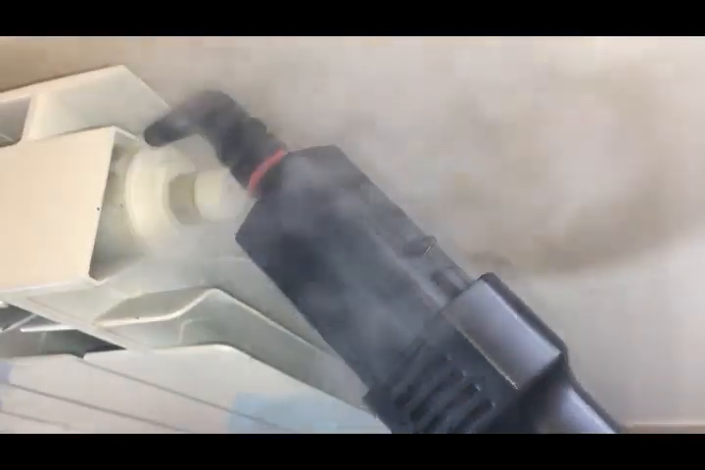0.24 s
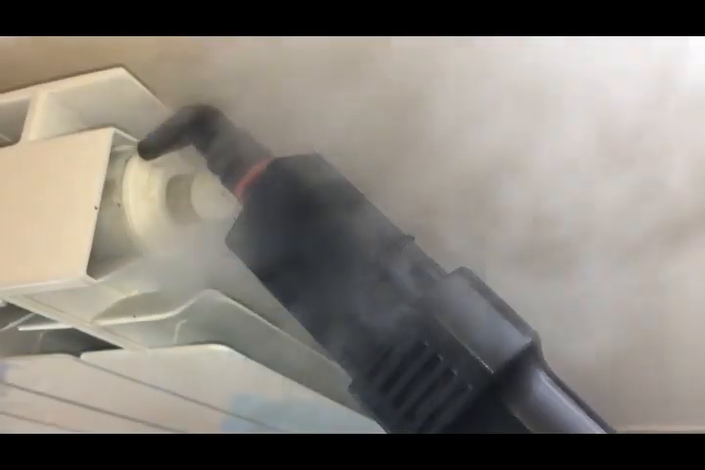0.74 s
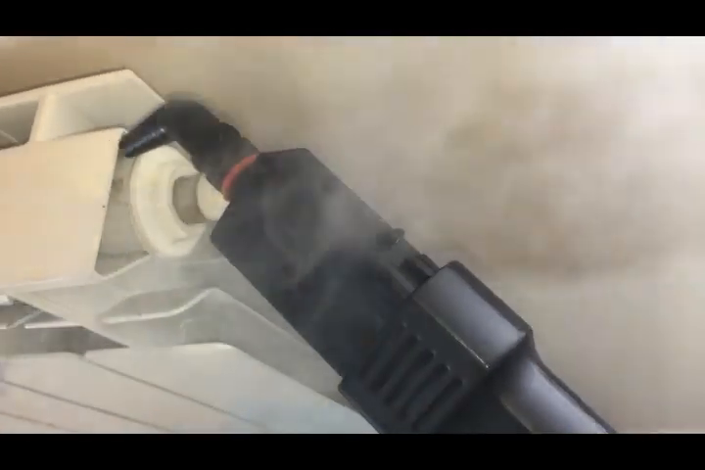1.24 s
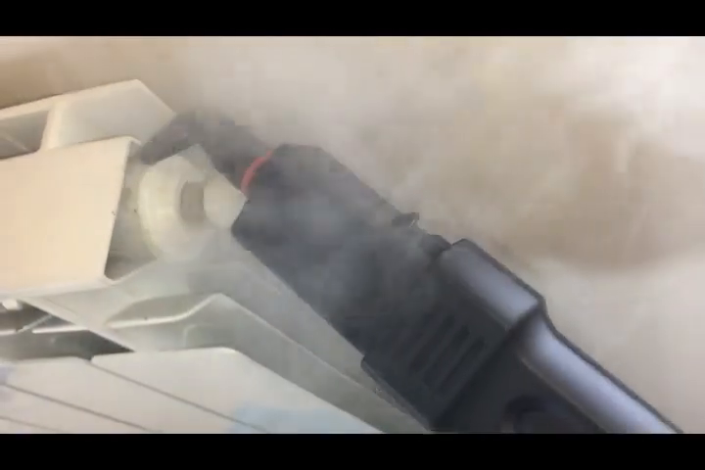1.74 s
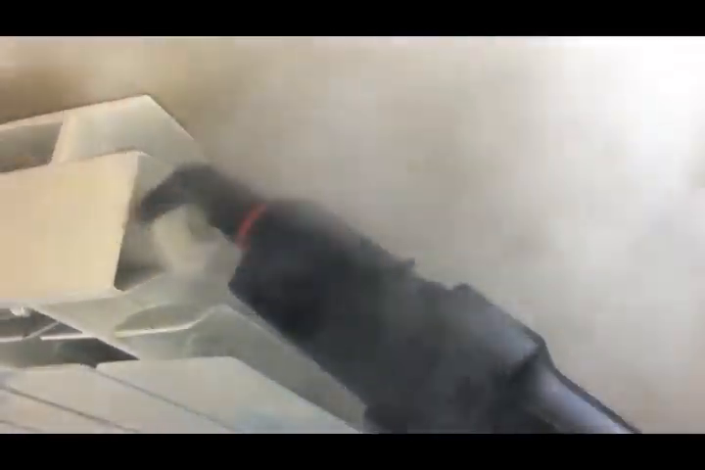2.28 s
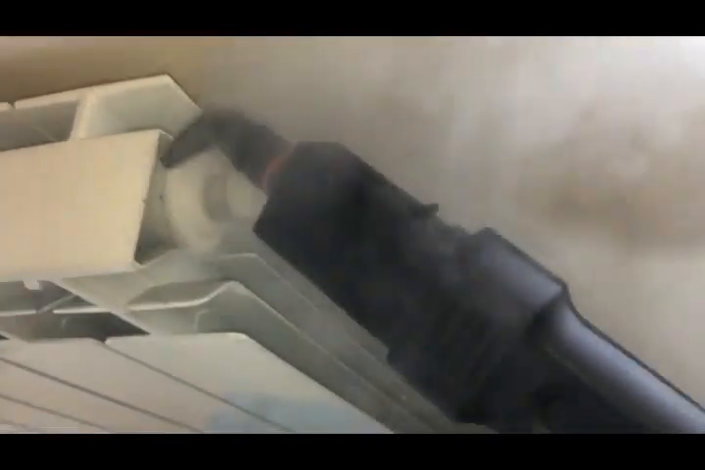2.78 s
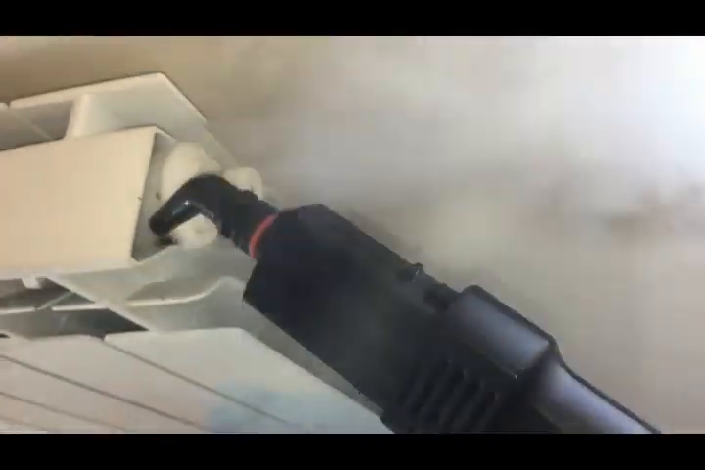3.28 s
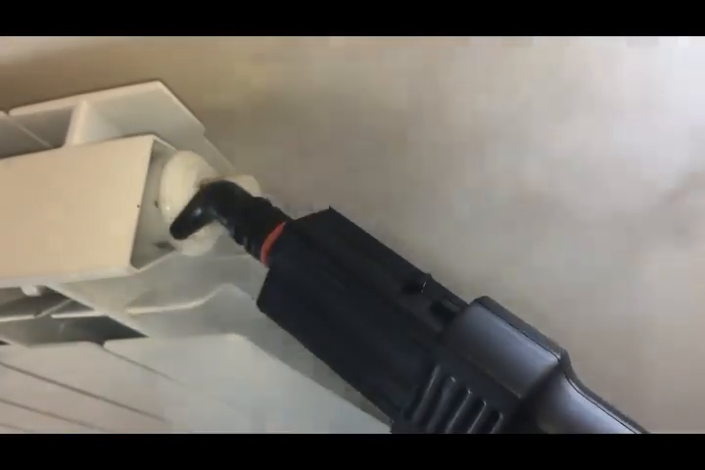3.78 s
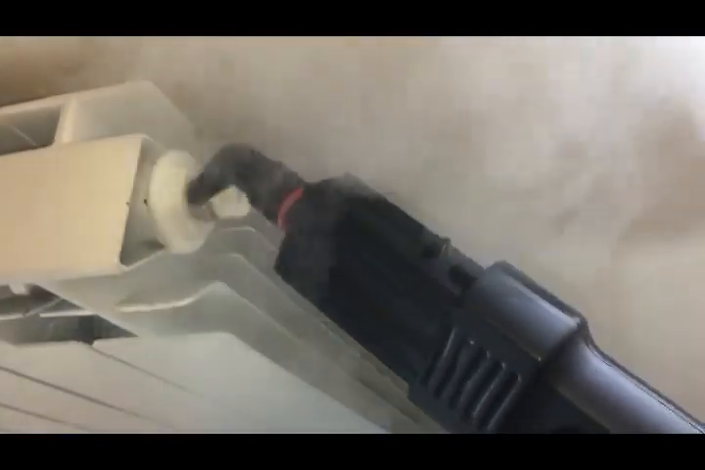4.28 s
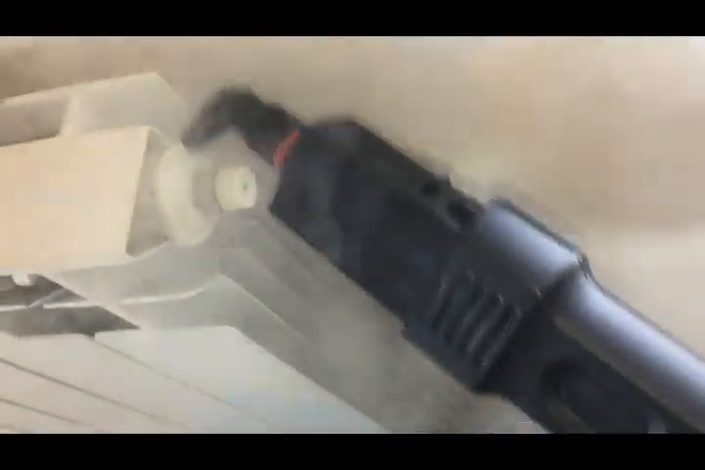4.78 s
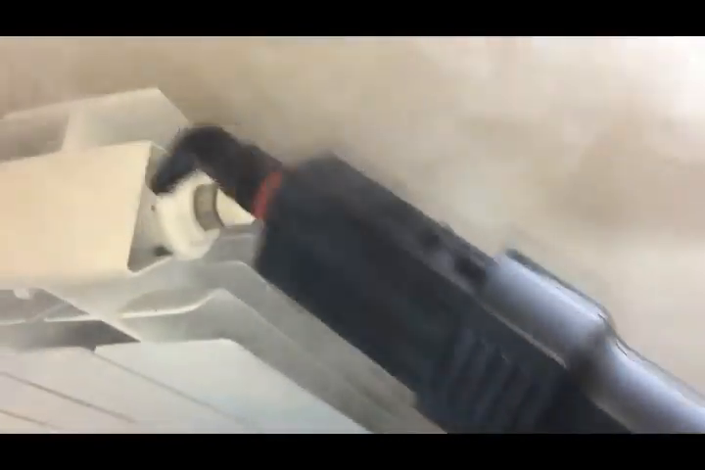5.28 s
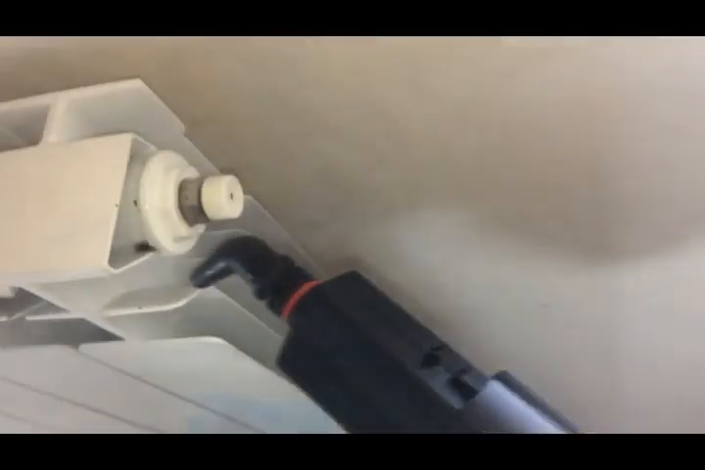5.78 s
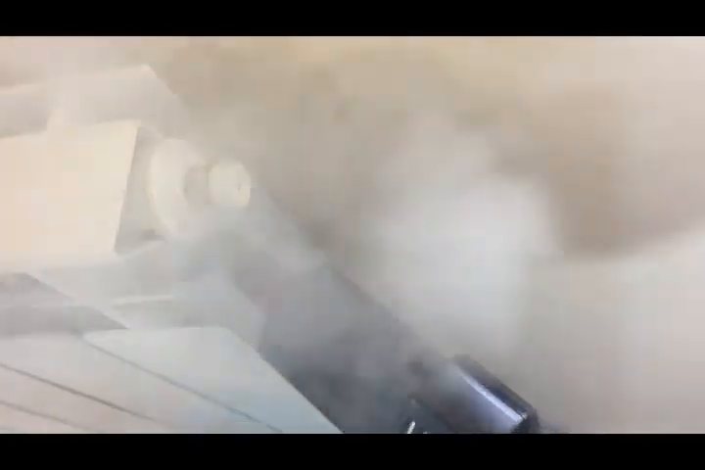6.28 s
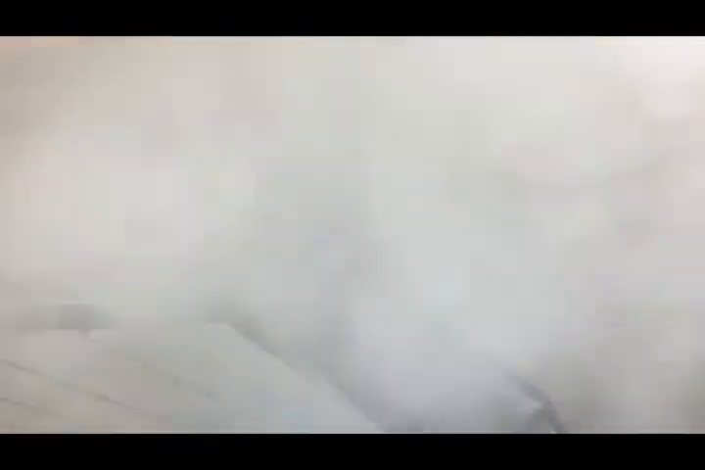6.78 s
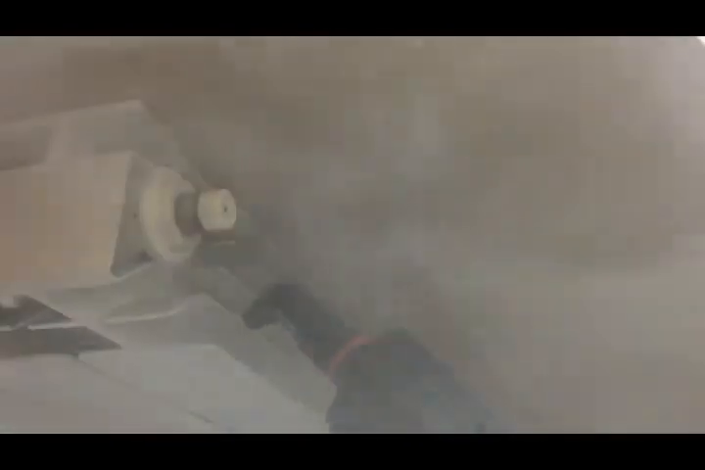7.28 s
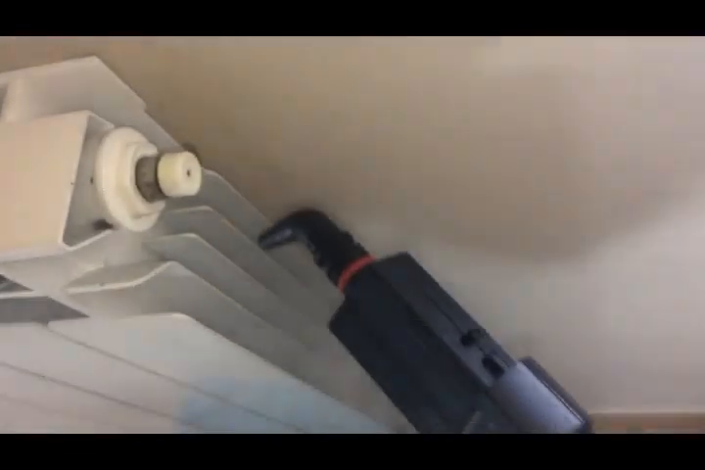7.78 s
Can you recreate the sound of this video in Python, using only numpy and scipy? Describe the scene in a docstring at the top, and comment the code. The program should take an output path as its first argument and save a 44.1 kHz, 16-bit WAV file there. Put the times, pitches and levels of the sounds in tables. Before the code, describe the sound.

A steam cleaner starts at once with a loud, bright hiss, joined by a gusty rumble as the jet strikes a metal radiator. From about 0.9 seconds it dies away, leaving a brief near silence. At 1.5 seconds a hollow pop and a short spit of water open the longest burst. The hiss surges, flutters and sweeps in tone as the nozzle moves, with sharp high flares around 2.7 and 3.1 seconds. Underneath, the panels rumble in puffs and the gaps in the radiator give a faint, breathy whistle. This burst fades from about 5.4 seconds. At 6 seconds another hollow pop starts the third blast, its rumble building from about 6.4 seconds. After 7.1 seconds the steam bleeds off, growing duller and weaker until it is almost gone at 8 seconds. The room is small, with a short echo, heard through one microphone.

```python
"""Steam cleaning a radiator valve

A steam cleaner blasts a radiator in three squeezes of the trigger; after each the hose bleeds empty.
The jet hisses, makes the hollows of the radiator sing and rumbles where it strikes. An echo off the
near metal sweeps the hiss as the nozzle moves. The room is small, and there is one microphone."""
import sys
import numpy as np
from scipy import signal
from scipy.fft import rfft, irfft
from scipy.io import wavfile
from scipy.ndimage import uniform_filter1d

SR = 44100
rng = np.random.default_rng(int(sys.argv[2]) if len(sys.argv) > 2 else 0)


def file_out(sig):
    """Save sig as 16-bit WAV at sys.argv[1]."""
    # one column per channel
    cols = np.atleast_2d(sig).T
    # limit, then scale
    lim = np.clip(cols, -1, 1)
    pcm = np.round(lim * 32767).astype(np.int16)
    wavfile.write(sys.argv[1], SR, pcm)


N = 354563
FRAME, HOP = 1024, 256  # noise is shaped in short overlapping frames; size and step in samples
TIME = np.arange(N) / SR
FRAME_S = np.arange(N // HOP + 2) * HOP / SR
BINS_HZ = np.fft.rfftfreq(FRAME, 1 / SR)
TOP_HZ = 15800  # upper edge of the sound

# tone of the quiet room air: pitch_hz, level_db
AIR_TONE = [(20, -17), (60, 16), (200, -15.5), (600, -33), (2000, 28), (6000, -33), (16000, -27)]
# the room's echoes: pitch_hz, fade_s (time to fall 60 dB), level_db
ROOM_ECHOES = [(100, 0.69, -7.5), (1200, 0.21, -1), (4000, 0.3, -0.5), (8040, 0.83, -9), (16000, 0.13, -20)]
# squeezes of the trigger; the jet is on the metal from strike_s to leave_s:
# start_s, let_go_s, shut_s, bleed_s, hiss_db, rumble_db, strike_s, leave_s
SQUEEZES = [(-0.005, 0.85, 1.29, 0.41, -19.5, -27.5, 0.2, 1.34),
            (1.548, 5.41, 6.03, 0.7, -19, -28, 1.78, 5.52),
            (6.034, 7.066, 8.1, 0.95, -21, -32.5, 6.42, 7.39)]
# the wisp that leaks past the shut trigger: hiss_db, hollows_db, rumble_db
WISP = (-70.5, -56, -63)
# where the jet points: time_s, place (0 = corner of the radiator, 1 = valve, 2 = fins)
AIM = [(0, 0), (2.28, 0.023), (2.4, 0.52), (4.2, 1.08), (5.2, 1.02), (5.33, 1.7)]
# pops as the second and third squeezes begin: start_s, level_db
POPS = [(1.544, -25.5), (6.034, -21.5)]
# ringing of the air in the barrel: pitch_hz, level_db, fade_s (time to fall 60 dB)
POP_TONES = [(642, 0.5, 0.069), (567, -27, 0.024), (1100, -5, 0.039)]
# one spit of water: start_s, level_db, decay_s
SPIT = (1.549, -17.5, 0.044)
# tone of that spray: pitch_hz, level_db
SPIT_TONE = [(1000, -33), (4000, -25), (6000, -11), (7500, -9), (9000, 4), (11500, -33), (12700, -14),
             (13400, 12), (14500, -4), (16000, -17)]
# tone of steam striking metal: pitch_hz, level_db
RUMBLE_TONE = [(20, -44), (35, -34), (50, -39), (75, -10.5), (140, -9.5), (190, -4.5), (290, -6),
               (500, 1.5), (800, -0.5), (1400, -4), (1800, -4.5), (2600, -25), (4000, -8.5), (9000, -22)]
# peaks and dips that the ringing panels add to it: pitch_hz, width_hz, gain_db
PANELS = [(207, 28, 5), (298, 50, -6.5), (359, 52, 6), (448, 55, -8), (517, 32, -0.5), (583, 73, -7.5),
          (762, 54, -7), (914, 25, 1), (1308, 38, 3), (1387, 28, 8.5)]
# low puffs where the jet hits a panel squarely: middle_s, length_s, gain_db
PUFFS = [(0.758, 0.1, 3.5), (1.988, 0.28, 1), (2.69, 0.052, 3.5), (3.0, 0.071, 3), (3.502, 0.59, 2.3),
         (4.267, 0.22, 3), (5.063, 0.31, 2), (5.33, 0.32, 6), (6.496, 0.18, 2), (6.92, 0.8, 3.5),
         (7.25, 0.39, 1.5)]
# ringing of the air around the valve: pitch_hz, width_hz, level_db
VALVE_HOLLOW = [(1595, 45, -11), (1912, 55, 0), (2085, 90, 1), (2200, 60, -8), (2314, 50, -9),
                (2440, 50, -10), (3150, 100, -14)]
# ringing of the air between the fins: pitch_hz, width_hz, level_db
FIN_HOLLOW = [(1930, 59, 11.5), (2087, 480, 16), (2134, 37, 25.5), (2480, 270, 19.5), (2800, 690, -3),
              (3320, 680, 4)]
# how strongly the hollows sing at full flow: time_s, level_db
SINGING = [(0, -27), (0.6, -34.5), (1.12, -25), (1.3, -33), (1.76, -21), (1.92, -29.5), (2.7, -25),
           (3.6, -32.5), (3.72, -23), (4.2, -28.5), (4.25, -42), (4.85, -34), (5.19, -23.5), (5.3, -42),
           (5.55, -27.5), (6.85, -31.5), (7.6, -24), (8.0, -46.5)]
# tone of the hiss on each part of the radiator: pitch_hz, corner_db, valve_db, fins_db
HISS_TONE = [(2290, 0.5, -4.5, 0.5), (3040, -3, 2, 1), (3670, -5.5, -5, -9.5), (4310, 0.7, 3, -2),
             (4730, 2, -1.5, -1), (6360, 5, -1, 3.5), (7500, -3.5, -3.5, 2.3), (8000, 0.5, -2, 8),
             (9620, 8, 2.5, 1.5), (10450, -6, 0, -1.5), (11350, 1, -4, 1.5), (12170, 2, 0.5, -1),
             (13700, 2.5, 6, 5), (16100, 4.5, -0.5, 0.5)]
# the hiss surges as the jet slips past the metal, or dips when smothered: middle_s, length_s, gain_db
SURGES = [(0.16, 0.19, 6.5), (0.28, 0.08, -3), (0.36, 0.043, 3.5), (0.475, 0.099, 8.5), (0.575, 0.06, 6.5),
          (0.73, 0.1, 3), (0.91, 0.22, 4.5), (1.71, 0.35, 3.5), (2.03, 0.08, -1), (2.15, 0.14, 4.5),
          (2.58, 0.1, 2.5), (3.97, 0.24, 2.5), (4.18, 0.15, -1.5), (4.41, 0.13, 2.5), (4.6, 0.13, -2),
          (4.81, 0.17, 4), (4.96, 0.24, 1.8), (5.14, 0.14, 3.3), (5.31, 0.14, -2.5), (6.16, 0.22, 5.5),
          (6.36, 0.11, 4), (6.74, 0.27, 3), (7.18, 0.29, 2.8)]
# one band of hiss flares or dims as the jet grazes an edge: middle_s, length_s, pitch_hz, gain_db
FLARES = [(2.6, 0.08, 5000, 2), (2.71, 0.092, 6450, 11), (2.726, 0.14, 10640, 12),
          (2.733, 0.15, 13600, 9.5), (2.7, 0.12, 3107, -6), (2.91, 0.1, 3000, 5), (3.097, 0.1, 3100, -2),
          (3.073, 0.095, 13000, 12.5), (3.074, 0.13, 6760, 13.5), (3.7, 0.66, 9900, 3.5),
          (3.65, 0.3, 6240, 5), (3.972, 0.13, 12900, 9.5), (4.13, 0.14, 2800, 5), (4.44, 0.18, 7500, 7.5),
          (4.64, 0.065, 9600, 12), (4.792, 0.084, 14000, 3), (5.03, 0.25, 9100, 6.5), (5.14, 0.1, 5530, 8),
          (5.322, 0.14, 8950, 12), (5.478, 0.2, 2700, 2.5), (6.152, 0.16, 9900, 5), (7.25, 0.14, 8500, 4)]
# distance from nozzle to metal: time_s, gap_cm
NOZZLE_GAP = [(0.4, 3.64), (1.25, 3.5), (1.66, 2.8), (2.55, 4.47), (2.78, 4.5), (3.09, 2.92), (3.3, 5.26),
              (4.06, 4.97), (4.35, 4.23), (5.23, 3.85), (5.49, 6.3), (5.72, 5.46), (6.2, 5.32),
              (6.57, 5.55), (7.0, 5.1), (7.48, 7.73), (7.68, 6.4), (8.04, 3.73)]
# how much of the hiss each part bounces back: corner_share, valve_share, fins_share
ECHO_SHARES = (0.36, 0.32, 0.7)


def gain_of(db):
    """Turns decibels into a number to multiply by."""
    return 10 ** (np.asarray(db) / 20)


def evened(x):
    """Scales a signal to an average strength (rms) of 1."""
    return x / np.sqrt(np.mean(x ** 2) + 1e-20)


def follow(rows, t):
    """The value of a two-column curve at times t."""
    return np.interp(t, *np.transpose(rows))


def at_pitch(rows, hz, column=1):
    """Looks up a column at any pitch, with the octaves evenly spaced."""
    table = np.transpose(rows)
    return np.interp(np.log(hz + 1), np.log(table[0] + 1), table[column])


def swells(rows):
    """Rounded rises and dips in dB, frame by frame."""
    return sum(db * np.exp(-abs(2 * (FRAME_S - s) / length) ** 3) for s, length, db in rows)


def wander(slow_hz, fast_hz):
    """A random wobble of strength 1, equally strong in each octave between two rates."""
    hz = np.fft.rfftfreq(N, 1 / SR)
    inside = (hz > slow_hz) & (hz < fast_hz)
    return evened(irfft(rfft(rng.standard_normal(N)) * inside / np.sqrt(hz + 1), N))


def drift(frames, bins):
    """Random patches of strength 1, smoothed over time and pitch."""
    field = rng.standard_normal((len(FRAME_S), len(BINS_HZ)))
    for _ in range(2):
        field = uniform_filter1d(uniform_filter1d(field, frames, axis=0), bins, axis=1)
    return evened(field)


def turbulence(shape, band_hz):
    """Rushing noise with a given tone and drifting swirls, of strength about 1 inside the band."""
    real, imaginary = rng.standard_normal((2, len(FRAME_S), len(BINS_HZ)))
    noise = real + 1j * imaginary
    shape = shape * gain_of(drift(frames=6, bins=16))
    inside = (BINS_HZ > band_hz[0]) & (BINS_HZ < band_hz[1])
    shape = shape / np.sqrt((shape[:, inside] ** 2).sum(1, keepdims=True) / len(BINS_HZ))
    spectra = np.array([noise.T, (noise * shape).T])
    white, shaped = signal.istft(spectra, nperseg=FRAME, noverlap=FRAME - HOP)[1][:, :N]
    return shaped / white.std()


def room_air(level_db=-68):
    """The faint, steady rush of air in the room."""
    return gain_of(level_db) * turbulence(gain_of(at_pitch(AIR_TONE, BINS_HZ)), (0, TOP_HZ))


def room(sound, early_db=-7, early_s=0.0047, tail_db=-13):
    """Wall and radiator add quick echoes, then a short tail; both are weak in the high treble."""
    t = TIME[:SR // 2]
    early = rng.standard_normal(len(t)) * np.exp(-t / early_s) * (t > .002)
    tail = rng.standard_normal(len(t)) * (t > .008)
    hz, s, (early, tail) = signal.stft([early, tail], SR, nperseg=256)
    early = evened(early)
    tail = evened(tail * gain_of(-60 * s / at_pitch(ROOM_ECHOES, hz)[:, None]))
    tone = gain_of(at_pitch(ROOM_ECHOES, hz, column=2))[:, None]
    spectrum = (gain_of(early_db) * early + gain_of(tail_db) * tail) * tone
    echoes = signal.istft(spectrum, SR)[1] / np.linalg.norm(signal.istft(early, SR)[1])
    echoes[0] = 1  # the direct sound
    return signal.fftconvolve(sound, echoes)[:N]


def aim_shares():
    """How much of the jet lands on corner, valve and fins, frame by frame."""
    place = follow(AIM, FRAME_S)
    return [np.maximum(1 - abs(place - k), 0)[:, None] for k in range(3)]


def steam_levels(opening_s=0.011, closing_s=0.013, build_s=0.015, stall_s=0.17, sag_db_per_s=2.21):
    """Levels in dB of hiss, hollows and rumble: all follow the flow; rumble needs metal in the way."""
    hiss = hollow = rumble = 0
    for start, let_go, shut, bleed_s, hiss_db, rumble_db, strike, leave in SQUEEZES:
        since_start, since_let_go, since_shut = (np.maximum(TIME - s, 0) for s in (start, let_go, shut))
        opening = (1 - np.exp(-since_start / opening_s)) * np.exp(-since_shut / closing_s)
        flow_db = -15.5 * (since_let_go / bleed_s) ** 1.62  # the flow falls faster and faster
        # the rumble starts weak, builds quickly, sags, then stalls as the jet leaves the metal
        before = (1 + np.tanh((strike - TIME) / build_s)) / 2
        after = (1 + np.tanh((TIME - leave) / stall_s)) / 2
        contact_db = -7 * before - 17.5 * after - sag_db_per_s * since_start
        hiss += opening * gain_of(hiss_db + flow_db)
        hollow += opening * gain_of(0.57 * flow_db)
        rumble += opening * gain_of(rumble_db + 0.96 * flow_db + contact_db)
    surge_db, puff_db = (np.interp(TIME, FRAME_S, swells(rows)) for rows in (SURGES, PUFFS))
    hiss *= gain_of(surge_db)
    hollow *= gain_of(follow(SINGING, TIME))
    rumble *= gain_of(puff_db - 0.28 * surge_db)  # steam that slips past rumbles less
    return [20 * np.log10(level + gain_of(db)) for level, db in zip((hiss, hollow, rumble), WISP)]


def trigger_pops(rise_s=0.0024):
    """The first slug of steam rings the air in the barrel with a hollow pop."""
    pops = np.zeros(N)
    for start_s, level_db in POPS:
        t = np.maximum(TIME - start_s, 0)
        ring = sum(gain_of(db - 60 * t / fade) * np.sin(2 * np.pi * hz * t) for hz, db, fade in POP_TONES)
        pops += gain_of(level_db) * (1 - np.exp(-t / rise_s)) * ring
    return pops


def water_spit(splutter_db=2):
    """Condensed water sprays out ahead of the steam as the second squeeze starts."""
    start_s, level_db, decay_s = SPIT
    tone = gain_of(at_pitch(SPIT_TONE, np.fft.rfftfreq(N, 1 / SR)))
    spray = evened(irfft(rfft(rng.standard_normal(N)) * tone, N))
    fade = (TIME > start_s) * np.exp(-np.maximum(TIME - start_s, 0) / decay_s)
    return spray * fade * gain_of(level_db + splutter_db * wander(60, 600))


def panel_rumble(level_db, trim_db=-2, gust_db=0.96, shake_db=2.5, puff_hz=280, puff_width_hz=130):
    """The jet breaks up on the panels in a gusty rumble; its bass shakes the most."""
    tone_db = at_pitch(RUMBLE_TONE, BINS_HZ)
    tone_db += sum(db / (1 + (2 * (BINS_HZ - hz) / width) ** 2) for hz, width, db in PANELS)
    tone_db = tone_db + shake_db * drift(frames=7, bins=6) / (1 + (BINS_HZ / 500) ** 2)
    tone_db += swells(PUFFS)[:, None] * np.exp(-((BINS_HZ - puff_hz) / puff_width_hz) ** 2)
    rumble = turbulence(gain_of(tone_db), band_hz=(120, 1400))
    return rumble * gain_of(level_db + trim_db + gust_db * wander(5.1, 70))


def singing_hollows(level_db, trim_db=-2, flutter_db=1.43):
    """Steam blowing across the gaps of the radiator makes the air in them ring."""
    def peaks(rows):
        powers = (gain_of(db) ** 2 / (1 + 2 * ((BINS_HZ - hz) / width) ** 2) ** 2 for hz, width, db in rows)
        return np.sqrt(sum(powers))
    corner, valve, fins = aim_shares()
    tone = (corner + valve) * peaks(VALVE_HOLLOW) + fins * peaks(FIN_HOLLOW)
    song = turbulence(tone, band_hz=(1800, 2500))
    return song * gain_of(level_db + trim_db + flutter_db * wander(12, 80))


def metal_echo(shares, sound_cm_per_s=34300, behind_cm=2.84, behind_share=0.051):
    """The hiss meets its own echo, making peaks and dips in its tone that slide as the nozzle moves."""
    delay_s = 2 * follow(NOZZLE_GAP, FRAME_S)[:, None] / sound_cm_per_s
    echo = sum(share * bounce for share, bounce in zip(shares, ECHO_SHARES))  # flat fins bounce best
    echo = echo * np.exp(-BINS_HZ / 45000)  # every surface scatters some treble
    echo *= 1 - shares[1] * np.exp(-(BINS_HZ / 4500) ** 2)  # the valve is too small for long waves
    turn = -2j * np.pi * BINS_HZ
    behind = behind_share * np.exp(turn * 2 * behind_cm / sound_cm_per_s)  # off metal further back
    return abs(1 + echo * np.exp(turn * delay_s) * (1 + behind))


def edge_flares(width_hz=650):
    """Gain in dB over time and pitch from the edges that the jet grazes."""
    gain_db = 0
    for middle_s, length_s, hz, db in FLARES:
        swell = np.exp(-2 * ((FRAME_S[:, None] - middle_s) / length_s) ** 2)
        gain_db += db * swell * np.exp(-((BINS_HZ - hz) / width_hz) ** 2)
    return gain_db


def jet_hiss(level_db, low_hz=2000, weak_db=-34, flutter_db=0.72, crackle_db=1.53):
    """Steam hisses out of the nozzle; the flow flutters and droplets roughen it."""
    shares = aim_shares()
    tone_db = edge_flares()
    tone_db += sum(share * at_pitch(HISS_TONE, BINS_HZ, k + 1) for k, share in enumerate(shares))
    # a dying jet loses its treble first, and a surging one gains some
    surge_db = np.interp(TIME, FRAME_S, swells(SURGES))
    db_per_octave = -0.15 + 0.072 * np.minimum(level_db - weak_db, 0) + 0.11 * surge_db
    octaves = np.log2(np.maximum(BINS_HZ, low_hz) / low_hz)
    tone_db += np.interp(FRAME_S, TIME, db_per_octave)[:, None] * octaves
    # the treble shifts in patches, most where the knobbly valve scatters it
    patch_db = (1.36 + 1.5 * shares[1]) * np.minimum(BINS_HZ / 9000, 1.2)
    tone_db += patch_db * drift(frames=11, bins=14)
    bass_cut = 1 / np.sqrt(1 + (low_hz / (BINS_HZ + 1)) ** 8)  # a thin jet gives off little bass
    hiss = turbulence(metal_echo(shares) * gain_of(tone_db) * bass_cut, band_hz=(3500, 15500))
    return hiss * gain_of(level_db + flutter_db * wander(4.6, 48) + crackle_db * wander(50, 1100))


def scene():
    """All the steam sounds in the room, over its quiet air, alike in both channels."""
    hiss_db, hollows_db, rumble_db = steam_levels()
    steam = jet_hiss(hiss_db) + singing_hollows(hollows_db) + panel_rumble(rumble_db)
    steam += trigger_pops() + water_spit()
    return np.tile(room_air() + room(steam), (2, 1))


def record(dry, ceiling=0.97):
    """The very highest peaks are gently rounded off, then the recorder cuts the top of the treble."""
    rounded = dry / (1 + (dry / ceiling) ** 8) ** (1 / 8)
    treble_cut = signal.firwin(511, TOP_HZ, window=("kaiser", 9), fs=SR)
    return signal.oaconvolve(rounded, treble_cut[None], "same")


dry = scene()
out = record(dry)
file_out(out)
```